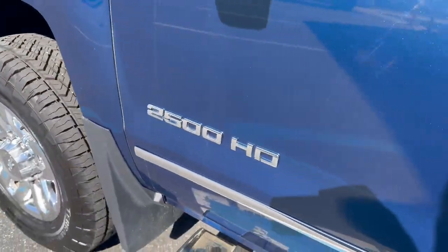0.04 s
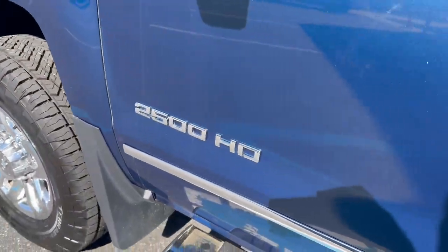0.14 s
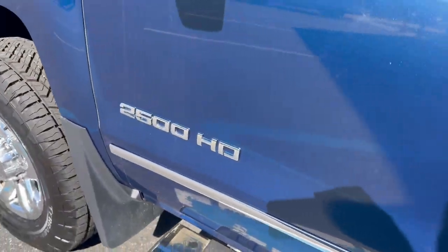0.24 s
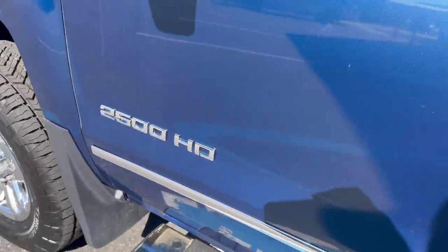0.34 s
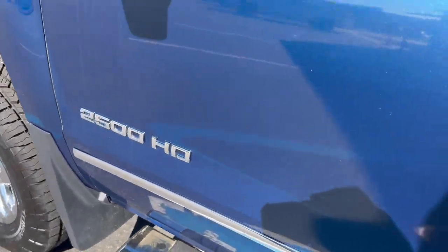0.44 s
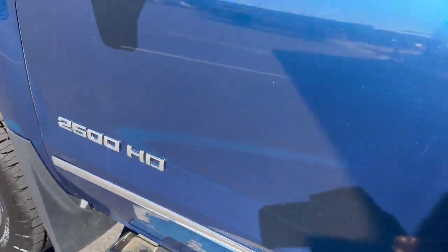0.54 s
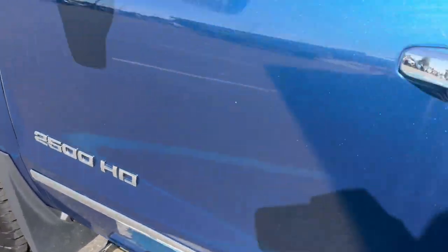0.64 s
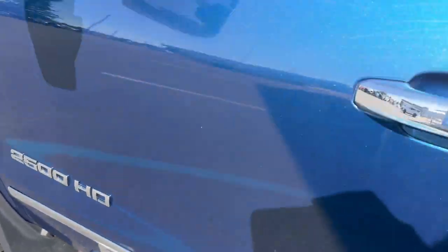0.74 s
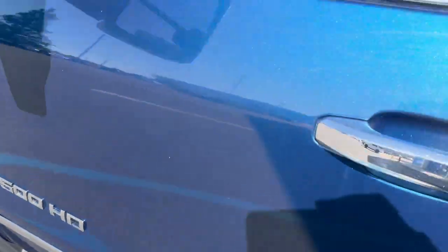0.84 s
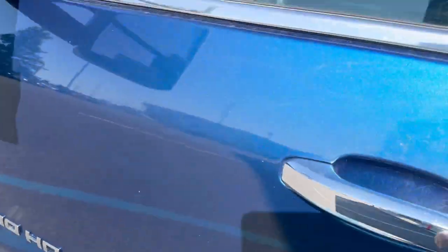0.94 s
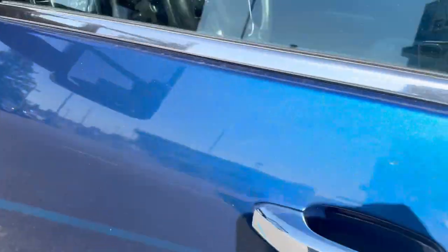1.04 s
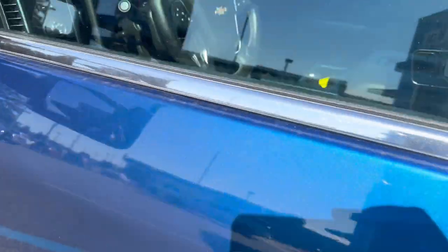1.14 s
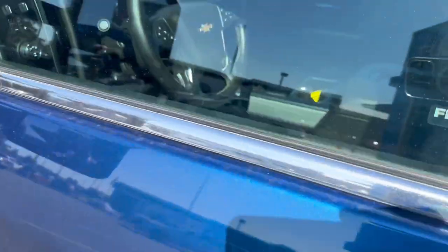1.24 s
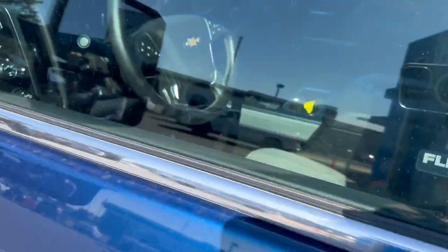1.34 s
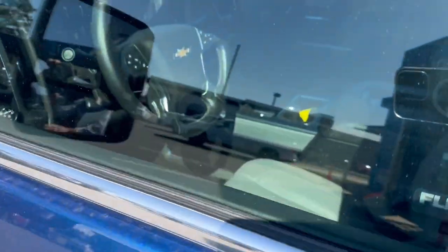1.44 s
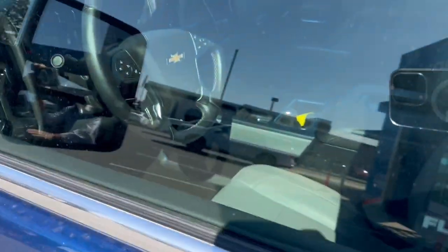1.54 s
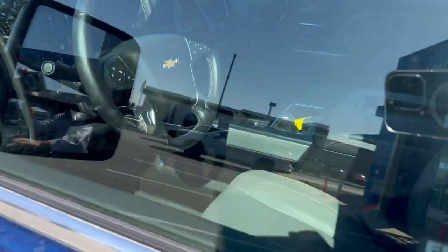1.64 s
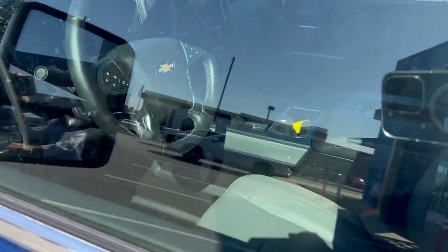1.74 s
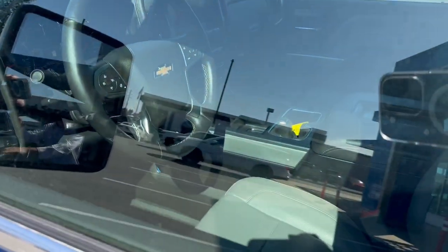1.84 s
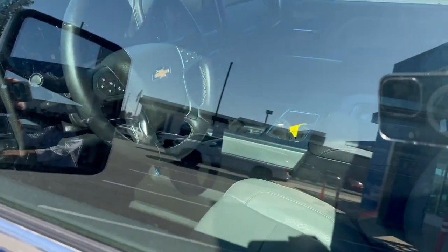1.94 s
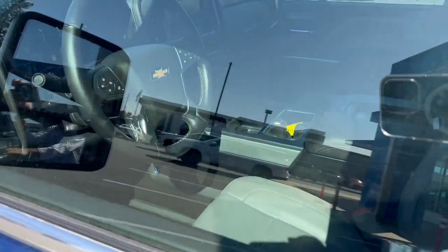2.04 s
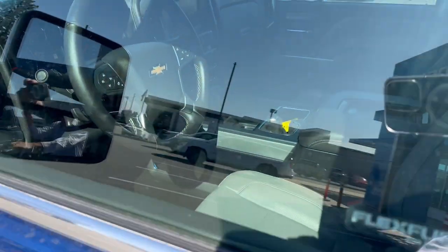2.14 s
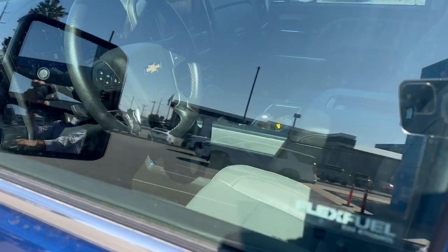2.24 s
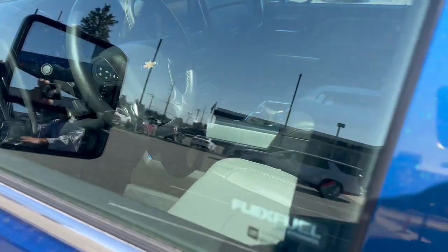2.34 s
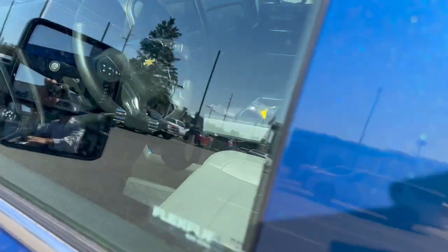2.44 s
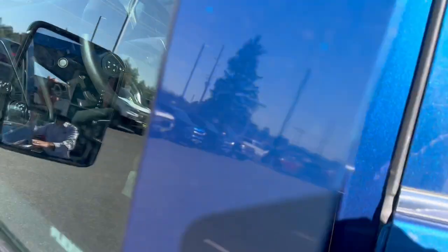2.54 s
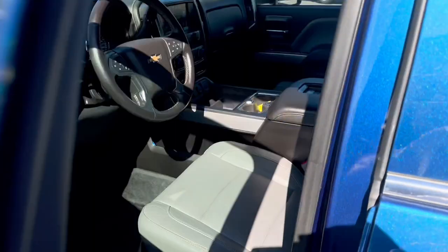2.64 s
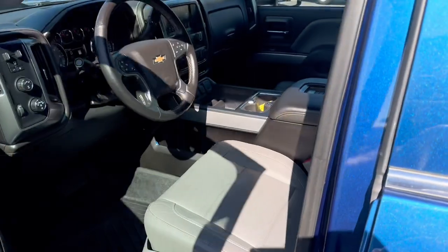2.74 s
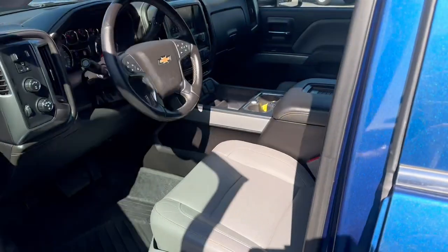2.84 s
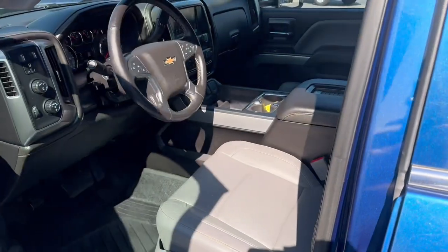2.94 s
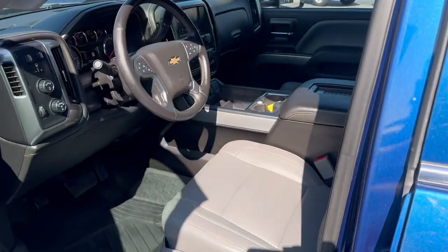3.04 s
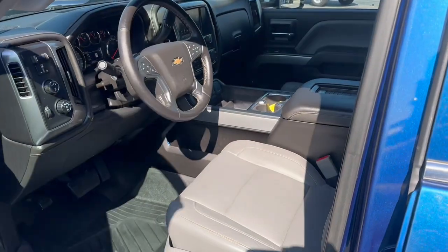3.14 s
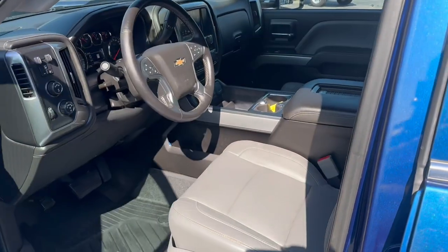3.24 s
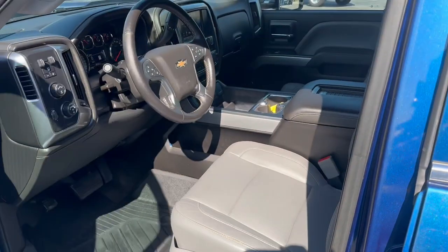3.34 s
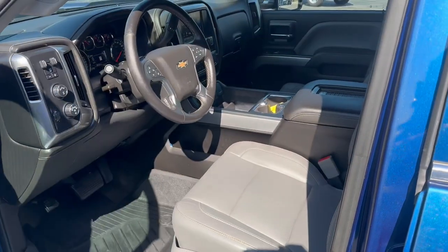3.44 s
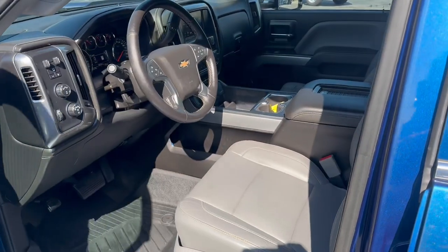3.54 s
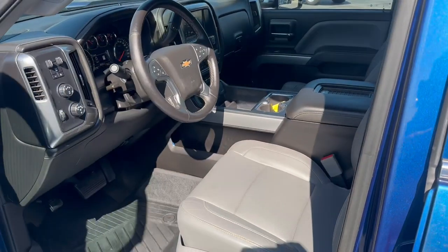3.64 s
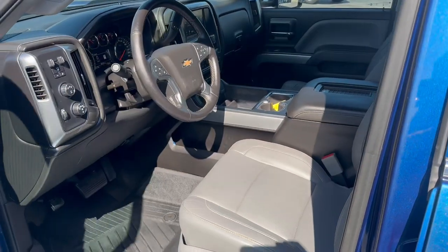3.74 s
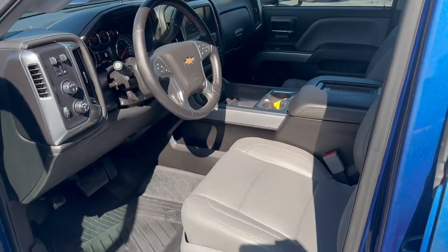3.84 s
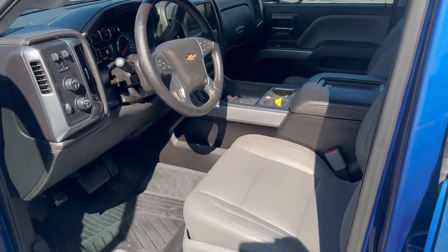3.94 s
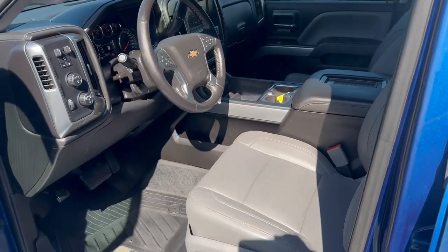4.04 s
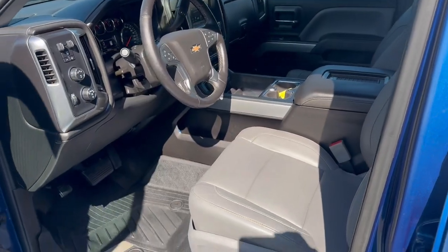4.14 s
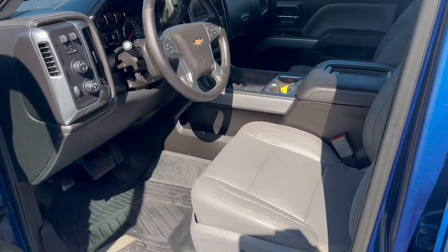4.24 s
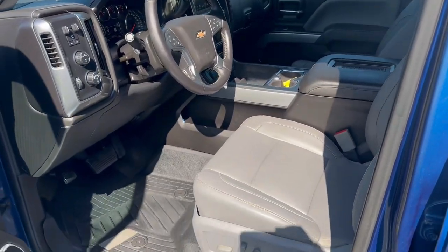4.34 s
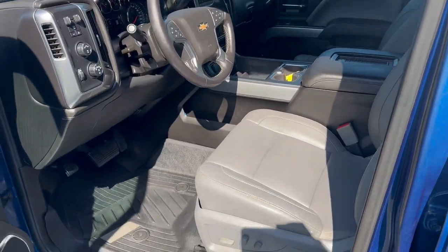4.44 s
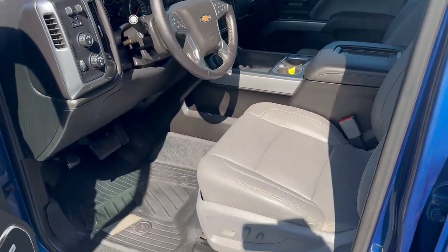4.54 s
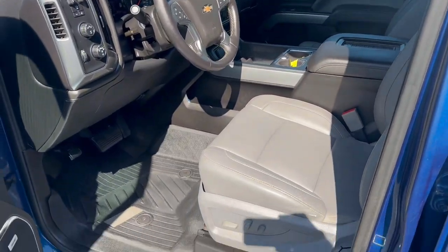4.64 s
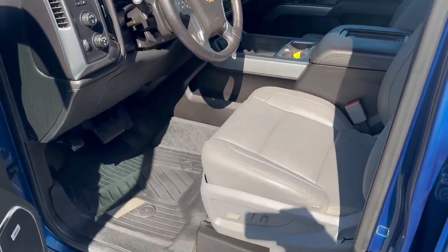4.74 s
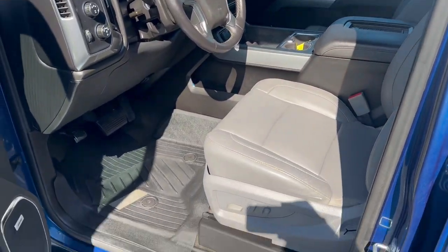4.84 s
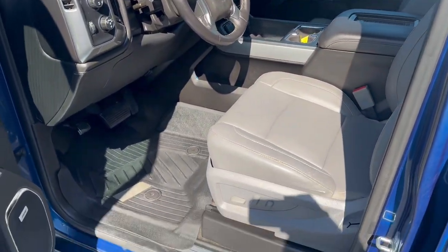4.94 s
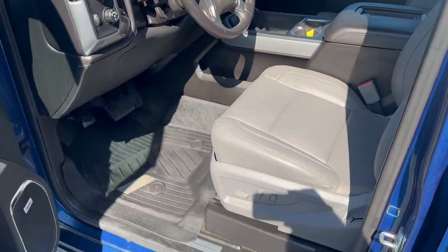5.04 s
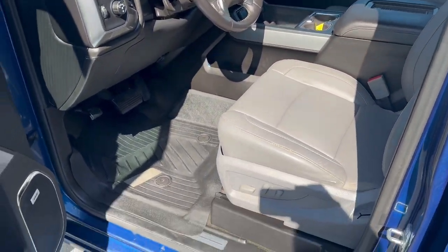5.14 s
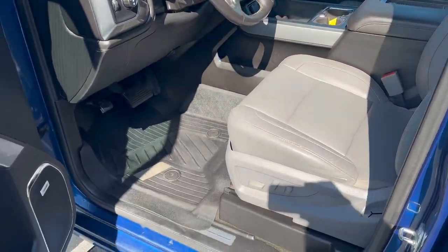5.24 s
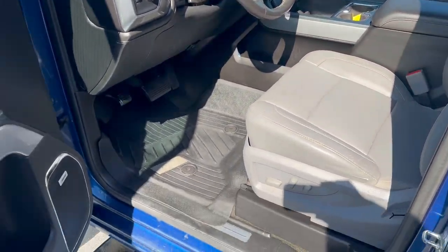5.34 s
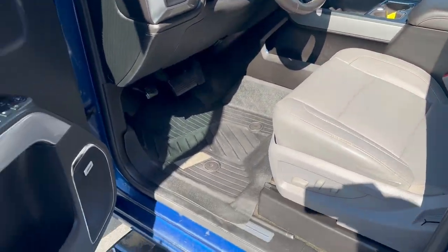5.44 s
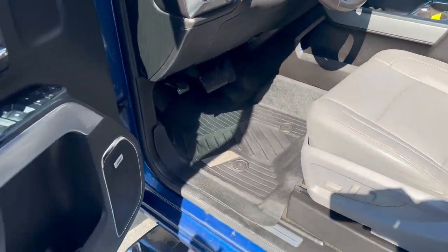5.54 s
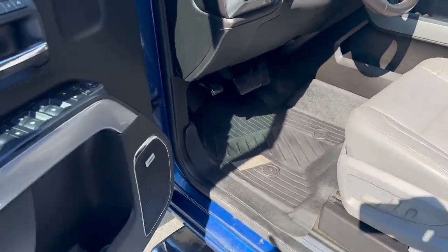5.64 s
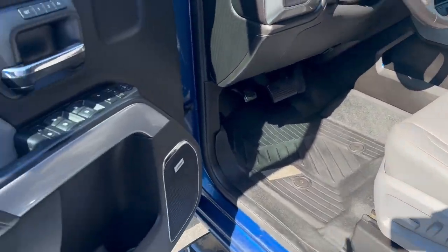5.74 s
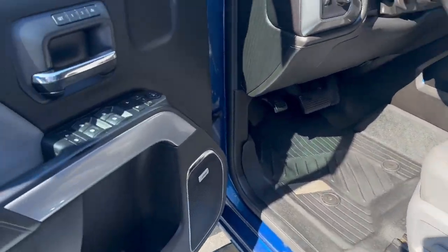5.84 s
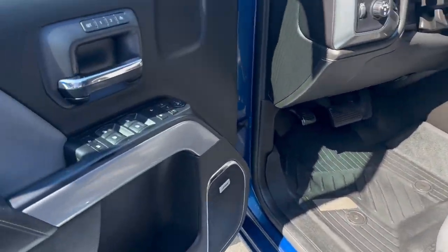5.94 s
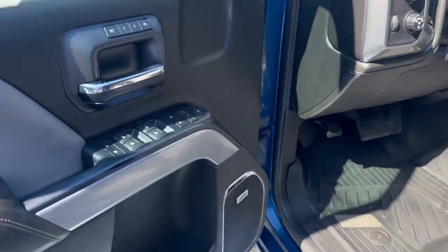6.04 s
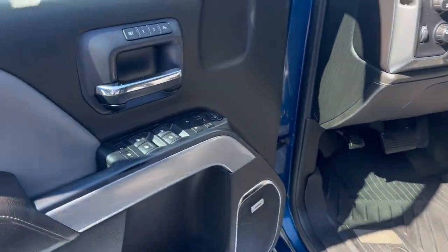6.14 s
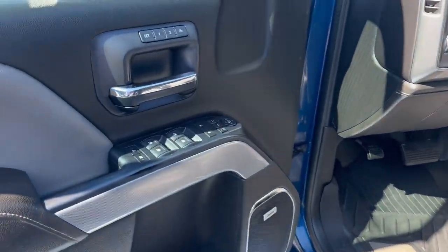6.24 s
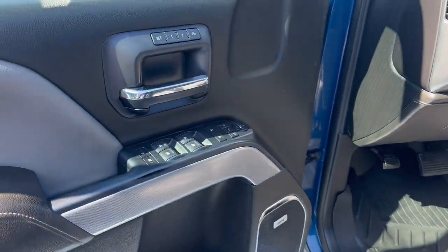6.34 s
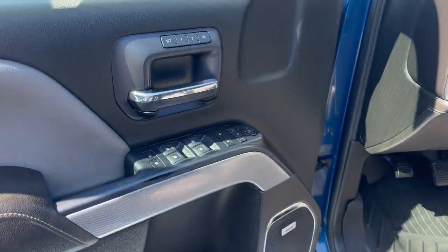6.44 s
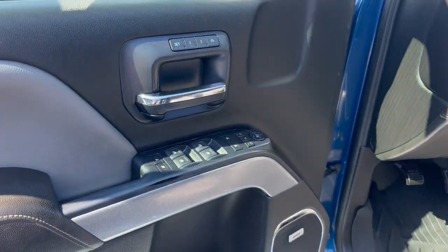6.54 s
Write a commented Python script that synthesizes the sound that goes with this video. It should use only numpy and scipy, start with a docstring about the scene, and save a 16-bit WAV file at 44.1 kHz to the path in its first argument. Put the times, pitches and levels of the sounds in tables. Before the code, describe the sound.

A low drone of idling engines and distant traffic fills an outdoor car lot from the start. After two faint ticks, at about 2.1 seconds, the latch of a pickup door lets go with a dull thud close to the microphone, while one engine rises very slightly. At 2.7 seconds the handle snaps back with a sharp metallic click and a clunk, the loudest moment. The swinging door pushes low, buffeting puffs of air over the microphone until about 3.3 seconds, and its hinge strap gives a short metallic rattle near 3.2 seconds. The rumble dips for about half a second, then returns. A light click comes at 4 seconds, with fainter ones near 5 and 5.9 seconds. The drone continues until the end, at about 6.6 seconds.

```python
"""A pickup door is opened on a car lot, close to a phone. From the start, engines drone over far traffic.
Near 2.1 s one engine revs gently and the latch lets go with a thud; at 2.7 s the handle snaps back. These
impacts excite the normal modes of door skin and steel parts. The swinging door then pushes puffs of air
over the microphone ports, and its check strap rattles near 3.2 s. After the gust the low rumble dips for
a moment, and a few light clicks follow over the drone."""
import sys
import numpy as np
from scipy import signal
from scipy.fft import rfft, irfft, next_fast_len
from scipy.io import wavfile
from scipy.ndimage import uniform_filter1d, map_coordinates

SR = 44100
rng = np.random.default_rng(int(sys.argv[2]) if len(sys.argv) > 2 else 0)


def master(y):
    """Save y as 16-bit WAV."""
    cut = np.clip(np.atleast_2d(y).T, -1, 1)
    pcm = np.round(cut * 32767)  # scale
    wavfile.write(sys.argv[1], SR, pcm.astype(np.int16))


N = 290178

# Noise spectra of low rumble, tyres, far hiss and gust: frequency_hz, relative_density_db
RUMBLE_SPECTRUM = [(12, -57), (20, -34), (32, -12.5), (53, -7.5), (76, 2), (94, -3.5), (113, -8), (146, -1),
                   (182, -14), (260, -17), (340, -26), (570, -120)]
TRAFFIC_SPECTRUM = [(110, -58), (180, -8.5), (278, -5.5), (307, -2.5), (335, -9), (424, -11), (492, -11.5),
                    (571, -10.5), (751, -7.5), (850, -11.5), (974, -10), (1120, -14), (3500, -31.5),
                    (4550, -40.5), (7700, -120)]
HISS_SPECTRUM = [(1470, -5.5), (2500, -6.5), (3040, -10), (3310, -6.5), (4310, -9), (4990, -7),
                 (5520, -8.5), (7020, -7), (8200, -6.5), (9660, -6.5), (12200, -16), (14800, -9),
                 (16000, -27)]
GUST_SPECTRUM = [(15, -52), (30, -7), (60, 5), (110, -2.5), (190, -1), (350, -12.5), (700, -25),
                 (1200, -63), (2000, -120)]
# Likeness of the background noise at the two microphone ports: frequency_hz, correlation
LOT_COHERENCE = [(60, 0.95), (130, 0.88), (290, 0.8), (640, 0.27), (1400, 0.038), (3100, 0.39),
                 (5000, 0.53), (7000, -0.045), (8500, -0.73), (9700, 0.45), (11000, 1), (12300, 1),
                 (13500, 0.35), (16000, 0.33)]
# Stereo balance of the background: frequency_hz, left_over_right_db
LOT_BALANCE = [(60, 0), (110, 3), (200, 0.5), (380, 2.5), (700, 2.5), (1290, 0), (2380, -1.5), (4400, 4),
               (8120, 2), (15000, -1)]
# Envelopes of the far road: time_s, traffic_db, hiss_db
ROAD_LEVELS = [(0, -39.5, -51.5), (.9, -42.5, -54.5), (1.8, -42, -60.5), (2.5, -42.5, -58),
               (3.3, -42.5, -56), (4.4, -42.5, -55.5), (5.6, -41.5, -55.5), (6.58, -42, -56.5)]
# Envelope shared by rumble, idling engine and drones: time_s, level_db
BASS_LEVELS = [(0, -33), (.9, -31.5), (1.9, -32.5), (2.2, -32.5), (2.5, -34), (3.2, -31), (3.4, -39.5),
               (3.9, -39.5), (4.05, -32), (4.5, -35.5), (4.85, -31.5), (5.3, -32.5), (6.2, -34),
               (6.58, -31.5)]
# Partials of the idling engine: multiple_of_firing_rate, level_db
ENGINE_ORDERS = [(1, -7), (2, -0.5), (2.5, -10.5), (3, -9.5), (4, -17.5)]
# Steadier engine tones: pitch_hz, level_over_bass_db, waver_db
DRONE_TONES = [(59.5, -8, 2), (70.96, -4, 3.5), (192.6, -20.5, 4.5)]
# Envelopes of two faint whines: time_s, low_whine_db, high_whine_db
WHINE_LEVELS = [(0, -55, -58), (1.4, -60.5, -66), (3.3, -73, -66), (3.9, -80, -59.5), (6.58, -73, -56.5)]
# Reverberation from cab and asphalt: frequency_hz, t60_s
REVERB_DECAY = [(150, 0.059), (1000, 0.15), (8000, 0.04)]
# Air puffs on the ports: start_s, level_db, pitch_hz, left_over_right_db
AIR_PUFFS = [(2.787, -13, 76, 3), (2.806, -26, 890, 3), (2.809, -9, 69.5, 2), (2.848, -26, 394, 4),
             (2.876, -9, 110, -0.5), (2.880, -19.5, 440, 2), (2.882, -27, 930, 14), (2.906, -8, 138, 0),
             (2.938, -10.5, 115, -1), (3.021, -15, 89, 0), (3.031, -18.5, 330, 0), (3.041, -13.5, 119, 0),
             (3.085, -13, 98, 1.5), (3.186, -15.5, 69.5, -1), (3.217, -20, 100, 2), (3.231, -23, 440, 8),
             (3.232, -28.5, 900, 4), (3.240, -11.5, 91, 1), (3.277, -10, 128, 3), (3.299, -18, 254, 2),
             (3.304, -12.5, 107, 1)]
# Phase difference of the door's sound between the ports: frequency_hz, left_lead_rad
PORT_PHASE = [(0, -2), (1210, 1.57), (1810, 0.4), (3010, 1), (3360, 1.5), (3700, 2.5), (4220, 1.7),
              (5860, 0.5), (7920, 2.5), (11900, -1.6), (12600, 6), (15000, -3), (15900, -1), (16400, 13)]
# Level difference of the door's sound between the ports: frequency_hz, left_over_right_db
PORT_BALANCE = [(60, -1), (110, 2.5), (200, -1), (380, 3), (700, 0.5), (1290, 17), (2380, -2), (4400, 4),
                (8120, 2), (15000, 2)]
# Rubbing of rubber and strap, and two soft rustles: start_s, length_s, level_db, centre_hz
RUB_EVENTS = [(0, 0.74, -59.5, 2200), (2.125, 0.044, -51.5, 9000), (2.682, 0.042, -39.5, 5000),
              (3.14, 0.07, -49, 7140), (3.149, 0.054, -45.5, 2720), (5.551, 0.64, -62.5, 2820)]
# Normal modes of handle and latch parts: pitch_hz, level_db, base_t60_s
STEEL_MODES = [(820, -3, .045), (1100, -8, .03), (1315, -6, .035), (1600, -7, .03), (2035, -5, .035),
               (2200, 0, .035), (2420, -8, .025), (2780, -8, .035), (3050, -9, .03), (3215, -13, .035),
               (3410, -16, .035), (4740, -18, .03), (5280, -12, .03), (5700, -15, .03), (6470, -13, .03),
               (9550, -12, .02), (10900, -14, .02), (13000, -15, .015), (14800, -17, .015)]
# Metal contacts: start_s, level_db, left_over_right_db, brightest_hz, fall_db_per_octave
METAL_CONTACTS = [(1.770, -43, -5, 5500, 11), (2.012, -40, 0, 5960, 9), (2.1355, -30, -5, 1300, 4.5),
                  (2.4712, -35.5, 1, 9100, 3), (2.6878, -24, 0, 1600, 10), (2.6975, -7.5, 3, 6500, 6),
                  (2.6978, -5.5, -2, 1650, 9.5), (2.7008, -18, 2, 850, 6), (2.7095, -18, 7, 2400, 4.5),
                  (3.1546, -16, -7, 2280, 7), (3.161, -24, 4, 2600, 17), (3.1885, -15, -5, 2850, 37),
                  (3.194, -17, 1, 3030, 37), (4.0312, -23.5, -3, 3360, 16.5), (4.978, -33, -2, 3220, 20),
                  (5.873, -34, -3, 3100, 20)]
# Normal modes of the door skin: pitch_hz, level_db, base_t60_s
SKIN_MODES = [(58, -2, .16), (100, -4, .12), (146, -1, .11), (178, -2, .14), (255, -8, .09), (320, 0, .09),
              (395, -8, .07), (435, -5, .08), (572, -8, .07), (676, -10, .07), (827, -10, .07),
              (996, -12, .06), (1226, -17, .05)]
# Blows on the door skin: start_s, level_db, most_excited_hz
SKIN_BLOWS = [(2.1366, -14, 654), (2.14, -9.5, 400), (2.1465, -7, 300), (2.152, -11, 55),
              (2.7027, -10.5, 560), (2.71, -13, 150), (2.731, -8, 85.4), (2.764, -10.5, 164)]

HALF_EACH_WAY = np.array([[0.5], [-0.5]])  # splits a difference between left and right


def amp(db):
    """The decibel scale: 20 dB is a factor of ten in amplitude."""
    return 10 ** (np.asarray(db) / 20)


def unit_rms(x):
    """Normalisation to a mean power of one."""
    return x / np.sqrt(np.mean(x ** 2) + 1e-20)


def at_frequency(points, hz):
    """Interpolation of (frequency_hz, value) points on a logarithmic frequency axis."""
    knots_hz, values = np.transpose(points)
    return np.interp(np.log(hz + 1), np.log(knots_hz + 1), values)


def envelopes(rows):
    """Linear interpolation in time: one envelope for each column after time_s."""
    times_s, *columns = np.transpose(rows)
    return [np.interp(np.arange(N) / SR, times_s, column) for column in columns]


def wobble(rate_hz):
    """Slow random modulation: a spline through rate_hz Gaussian values a second."""
    knots = rng.standard_normal(int(N * rate_hz / SR) + 4)
    return map_coordinates(knots, [np.arange(N) * rate_hz / SR])


def filtered(x, response):
    """Linear filtering: the spectrum is multiplied by a frequency response."""
    size = next_fast_len(x.shape[-1] + 8192)
    return irfft(rfft(x, size) * response(np.fft.rfftfreq(size, 1 / SR)), size)[..., :x.shape[-1]]


def add(out, start_s, sound, pan_db):
    """Superposition: a sound joins both channels, pan_db stronger on the left."""
    out[:, round(start_s * SR):][:, :sound.shape[-1]] += sound * amp(pan_db * HALF_EACH_WAY)


def stereo_noise(spectrum, coherence, patchy_db):
    """Partially coherent noise of rms 1: the ratio of mid to side sets the left-right correlation."""
    cells = signal.stft(rng.standard_normal((2, N)), nperseg=512)[2]
    patches = uniform_filter1d(rng.standard_normal(cells.shape[1:]), 6, axis=0)
    patches = uniform_filter1d(patches, 14, axis=1)  # random gain, smooth in frequency and time
    pair = signal.istft(cells * amp(patchy_db * unit_rms(patches)), nperseg=512)[1][:, :N]

    def response(hz):
        angle = np.arccos(np.clip(at_frequency(coherence, hz), -1, 1)) / 2
        return amp(at_frequency(spectrum, hz)) * [np.cos(angle), np.sin(angle)]

    mid, side = filtered(pair, response)
    return unit_rms(np.array([mid + side, mid - side]))


def tone(hz, waver_db, rate_hz):
    """A sinusoid under random amplitude and phase modulation."""
    level = amp(waver_db * wobble(rate_hz)) * np.sqrt(2)
    phase = 2 * np.pi * np.cumsum(hz * np.ones(N)) / SR
    return level * np.sin(phase + 1.16 * wobble(rate_hz))


def far_road():
    """Broadband noise: tyres on the road and a thin hiss, each under a slow envelope."""
    traffic_db, hiss_db = envelopes(ROAD_LEVELS)
    tyres = amp(traffic_db) * stereo_noise(TRAFFIC_SPECTRUM, LOT_COHERENCE, patchy_db=0.98)
    return tyres + amp(hiss_db) * stereo_noise(HISS_SPECTRUM, LOT_COHERENCE, patchy_db=1.43)


def whines():
    """Amplitude modulation makes two faint tones flutter; both sink, then the higher one returns."""
    low_db, high_db = envelopes(WHINE_LEVELS)
    low = amp(low_db) * tone(490, waver_db=7.5, rate_hz=30)
    return low + amp(high_db) * tone(748, waver_db=3.5, rate_hz=25)


def idling_engine(idle_hz=43.28, rev_rise_hz=5):
    """Engine orders are multiples of the firing rate, so one rev lifts all their pitches together."""
    rev, = envelopes([(1.9, 0), (2.1, 1), (3.4, 0)])
    firing_hz = idle_hz + rev_rise_hz * rev
    orders = sum(amp(db) * tone(k * firing_hz, waver_db=3.5, rate_hz=4) for k, db in ENGINE_ORDERS)
    return amp(-3 + 2.5 * rev) * orders


def car_lot():
    """Independent sources add in power: engines, whines, rumble and road form the background."""
    bass_db, = envelopes(BASS_LEVELS)
    engines = idling_engine()
    engines += sum(amp(db) * tone(hz, waver_db, rate_hz=3) for hz, db, waver_db in DRONE_TONES)
    whining = whines()
    rumble = amp(-1.5) * stereo_noise(RUMBLE_SPECTRUM, LOT_COHERENCE, patchy_db=1.5)
    background = amp(bass_db) * (rumble + engines) + whining + far_road()
    return filtered(background, lambda hz: amp(at_frequency(LOT_BALANCE, hz) * HALF_EACH_WAY))


def reverberation(x):
    """Convolution with a noise tail: reflections from cab and asphalt decay at a rate set by frequency."""
    hz, t, cells = signal.stft(rng.standard_normal((2, SR // 3)), SR, nperseg=256)
    decay = amp(-60 * t / at_frequency(REVERB_DECAY, hz)[:, None])
    tail = signal.istft(cells * decay, SR, nperseg=256)[1]
    return signal.fftconvolve(x, tail / np.linalg.norm(tail[0]), axes=1)[:, :N]


def air_puffs():
    """Pressure pulses: each lump of air off the moving door is a heavily damped swing at the ports."""
    out, t = np.zeros((2, N + SR)), np.arange(SR // 8) / SR
    for start_s, db, hz, pan_db in AIR_PUFFS:
        cycles = 1.27 * (hz / 100) ** 0.33  # higher puffs swing more often
        age = 3 * t * hz / cycles  # 1 at the envelope's peak
        phase_rad = 0.78 * rng.standard_normal() * HALF_EACH_WAY
        puff = age * np.exp(1 - age) * np.sin(2 * np.pi * hz * t + phase_rad)
        add(out, start_s, amp(db) * puff, pan_db)
    return out[:, :N]


def gust(start_s=2.68, rise_s=0.052, stop_s=3.27, fall_s=0.1, burst_t60_s=0.91):
    """Turbulence buffets the ports between the puffs: it bursts in, sinks to a draught and stops."""
    gate, = envelopes([(start_s, 0), (start_s + rise_s, 1), (stop_s, 1), (stop_s + fall_s, 0)])
    age_s = np.arange(N) / SR - start_s
    burst, draught = amp(-15 - 60 * np.abs(age_s) / burst_t60_s), amp(-32)
    lumps = amp(3.9 * np.array([wobble(25), wobble(24.86)]))
    buffeting = stereo_noise(GUST_SPECTRUM, coherence=[(30, 0.5), (600, 0.6)], patchy_db=2.5)
    return gate * (burst + draught) * unit_rms(lumps * buffeting)


def at_ports(x):
    """Path difference and directivity: two ports, apart and facing different ways, shift phase and level."""
    gain = lambda hz: amp(HALF_EACH_WAY * at_frequency(PORT_BALANCE, hz))
    phase_rad = lambda hz: HALF_EACH_WAY * at_frequency(PORT_PHASE, hz)
    return filtered(x, lambda hz: gain(hz) * np.exp(1j * phase_rad(hz)))


def rubbing():
    """Friction noise: a band of noise crackles as its level jumps from grain to grain."""
    out, grain_samples = np.zeros((2, N + SR)), 40
    for start_s, length_s, db, centre_hz in RUB_EVENTS:
        n = int(length_s * SR)
        grains = amp(4.4 * rng.standard_normal(n // grain_samples + 1)).repeat(grain_samples)[:n]
        grit = grains * rng.standard_normal(n)
        band = filtered(grit, lambda hz: amp(-9 * np.log2((hz + 1) / centre_hz) ** 2))
        progress = np.linspace(0, 1, n)
        swell = np.sqrt(np.clip(6 * progress * (1 - progress), 0, 1))
        add(out, start_s, amp(db) * unit_rms(band) * swell, pan_db=-4)
    return out[:, :N]


def ring(modes, excitation_db, t60_scale, t, scatter_db, spread_rad, neighbour_ratio):
    """Modal superposition: damped sinusoids of random strength, out of step between the two ports."""
    hz, db, t60_s = np.transpose(modes)[:, :, None]
    onset_db = db + excitation_db(hz) + scatter_db * rng.standard_normal(hz.shape)
    level = amp(onset_db - 60 * t / (t60_scale * t60_s))
    level *= neighbour_ratio ** np.arange(len(hz))[:, None]  # negative: neighbours start opposed
    phase_rad = spread_rad * rng.standard_normal(hz.shape)
    return np.array([np.sum(level * np.sin(2 * np.pi * hz * t + side * phase_rad), 0) for side in (1, -1)])


def metal_clicks(crack_t60_s=0.015, attack_s=0.00011):
    """Impulse excitation: a hard contact cracks and rings the steel modes near its brightest frequency."""
    out, t = np.zeros((2, N + SR)), np.arange(SR // 4) / SR
    for start_s, db, pan_db, brightest_hz, fall_db in METAL_CONTACTS:
        excitation_db = lambda hz: -fall_db * np.abs(np.log2(hz / brightest_hz))
        burst = amp(-60 * t / crack_t60_s) * rng.standard_normal(len(t))
        crack = filtered(burst, lambda hz: amp(excitation_db(hz + 1)))
        t60_scale = 0.5 * (3000 / brightest_hz) ** 0.8  # duller contacts ring longer
        steel = ring(STEEL_MODES, excitation_db, t60_scale, t,
                     scatter_db=5, spread_rad=0.57, neighbour_ratio=-0.91)
        attack = 1 - np.exp(-t / attack_s)
        add(out, start_s, amp(db) * (steel + crack) * attack, pan_db)
    return out[:, :N]


def door_thuds():
    """Plate vibration: the place and softness of a blow select which modes of the door skin respond."""
    out, t = np.zeros((2, N + SR)), np.arange(SR // 4) / SR
    for start_s, db, most_excited_hz in SKIN_BLOWS:
        excitation_db = lambda hz: -3 * np.log2(hz / most_excited_hz) ** 2
        t60_scale = 0.6 * (300 / most_excited_hz) ** 0.34  # deeper blows ring longer
        skin = ring(SKIN_MODES, excitation_db, t60_scale, t,
                    scatter_db=7, spread_rad=0.21, neighbour_ratio=0.95)
        attack = 1 - np.exp(-2.25 * most_excited_hz * t)
        add(out, start_s, amp(db) * skin * attack, pan_db=0.5)
    return out[:, :N]


def scene():
    """Superposition of the door's direct sound, its reflections, the moving air and the background."""
    door = at_ports(door_thuds() + metal_clicks() + rubbing())
    return door + amp(-12.5) * reverberation(door) + air_puffs() + gust() + car_lot()


def record(dry, bass_corner_hz=32, ceiling=0.95, band_limit_hz=15850):
    """Band limiting and soft saturation: the phone drops deep bass, rounds peaks and cuts the top treble."""
    high_passed = filtered(dry, lambda hz: (1j * hz / (bass_corner_hz + 1j * hz)) ** 2)
    rounded = high_passed / (1 + np.abs(high_passed / ceiling) ** 5) ** (1 / 5)
    return filtered(rounded, lambda hz: hz < band_limit_hz)


dry = scene()
out = record(dry)
master(out)
```